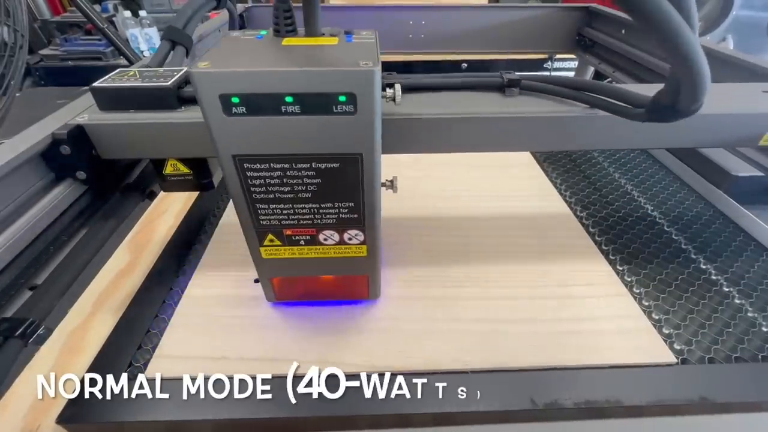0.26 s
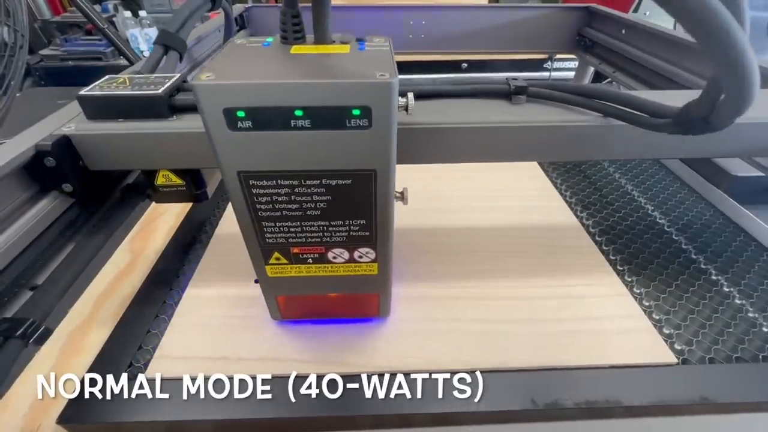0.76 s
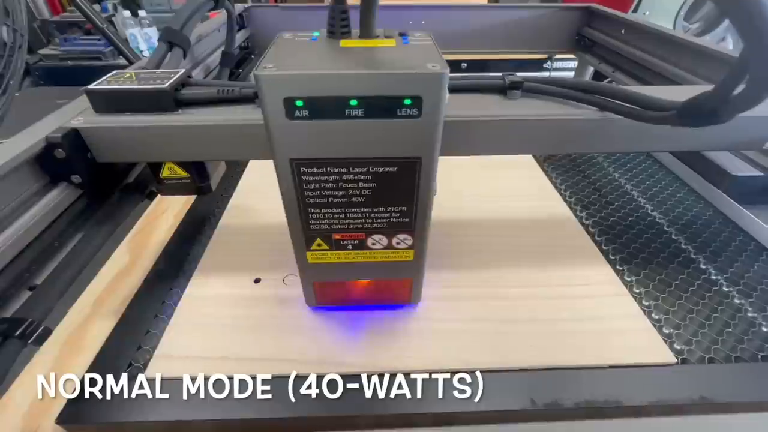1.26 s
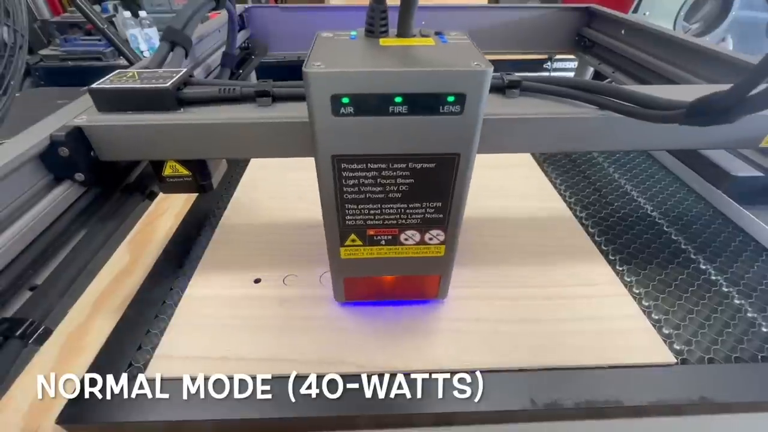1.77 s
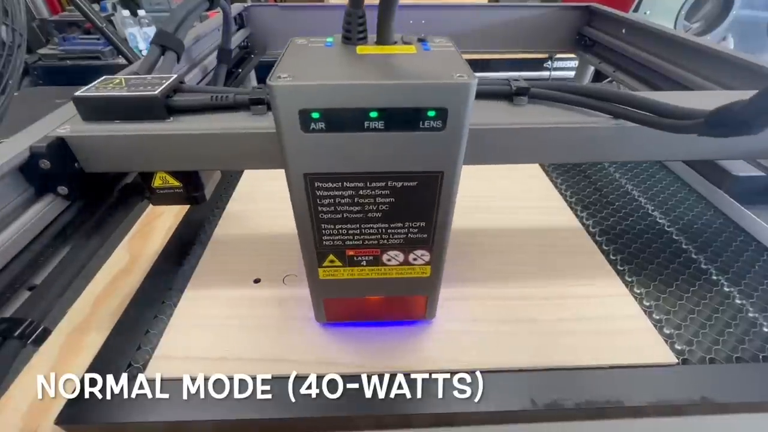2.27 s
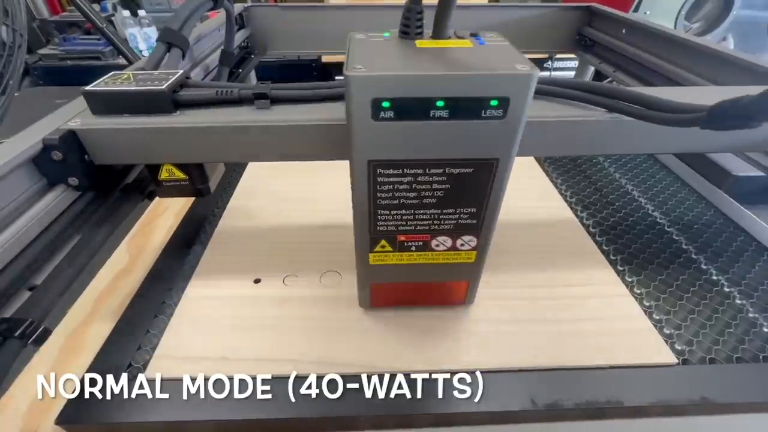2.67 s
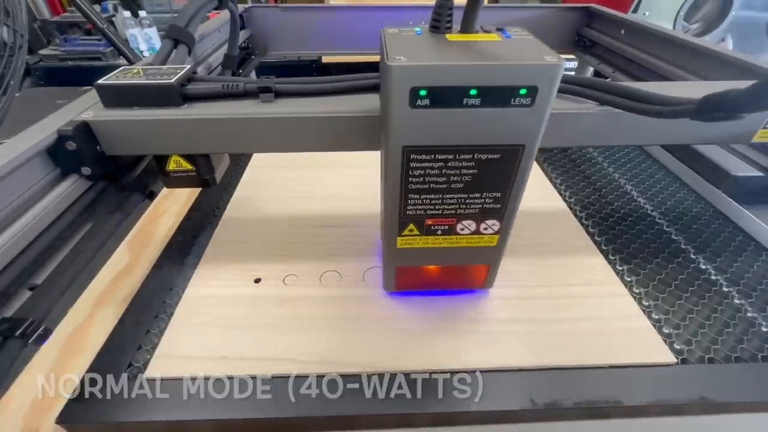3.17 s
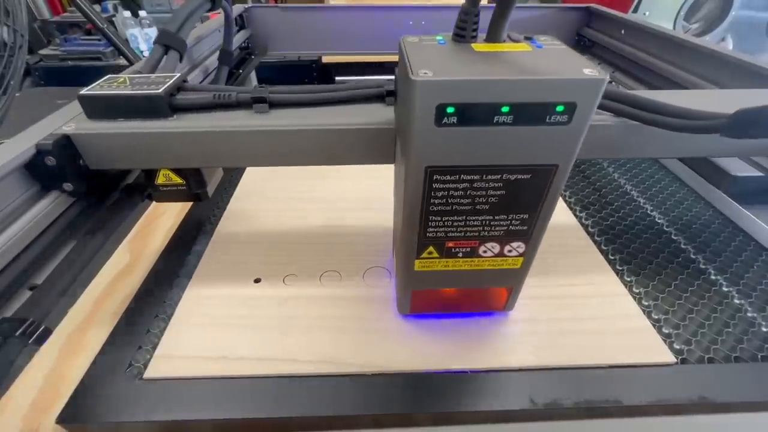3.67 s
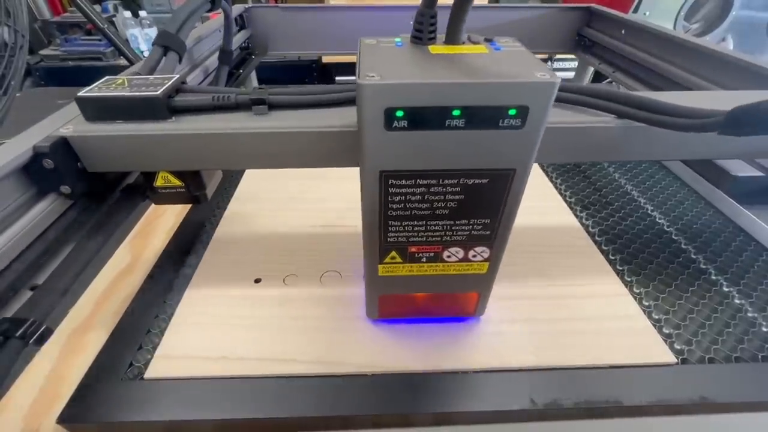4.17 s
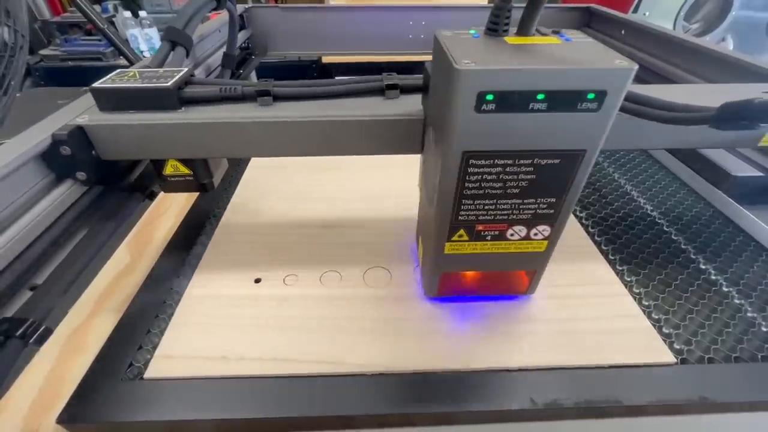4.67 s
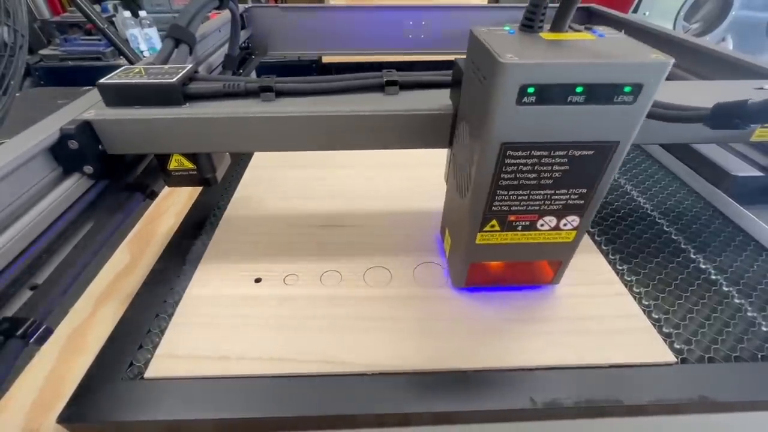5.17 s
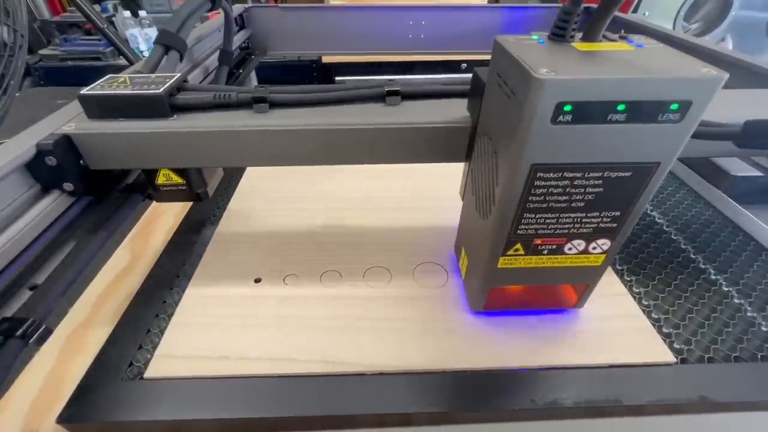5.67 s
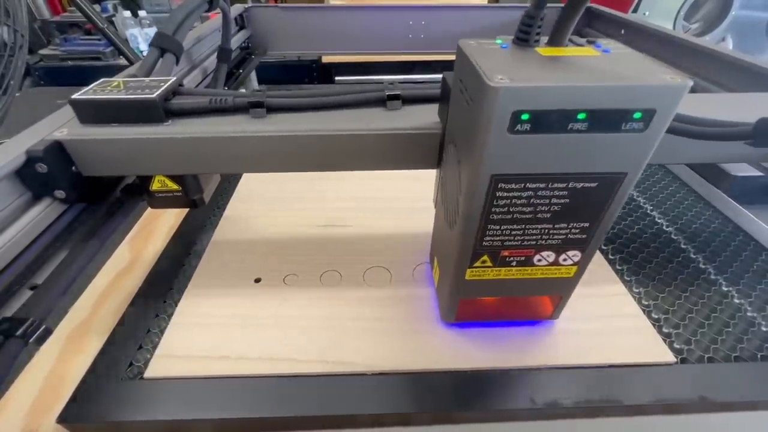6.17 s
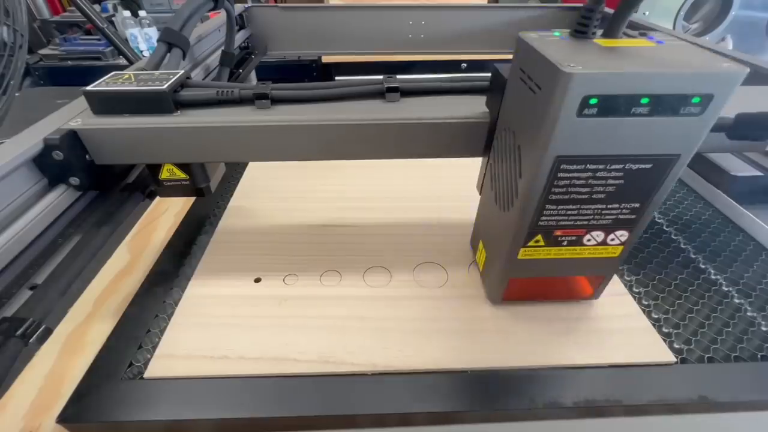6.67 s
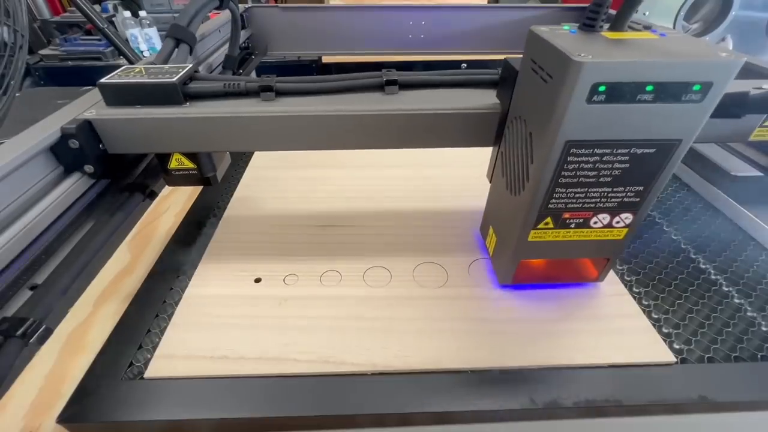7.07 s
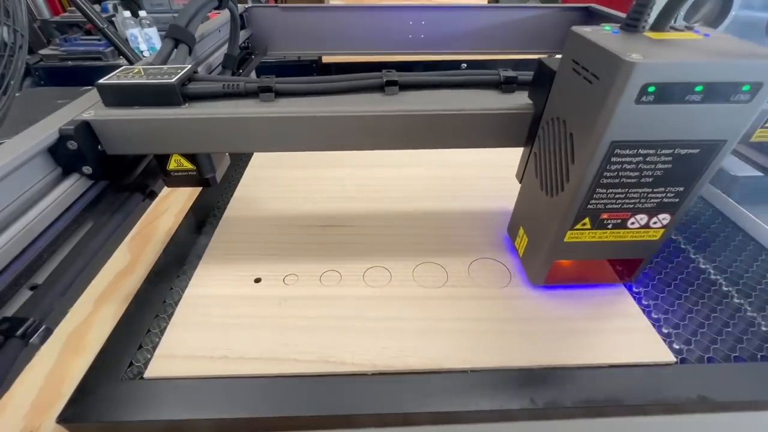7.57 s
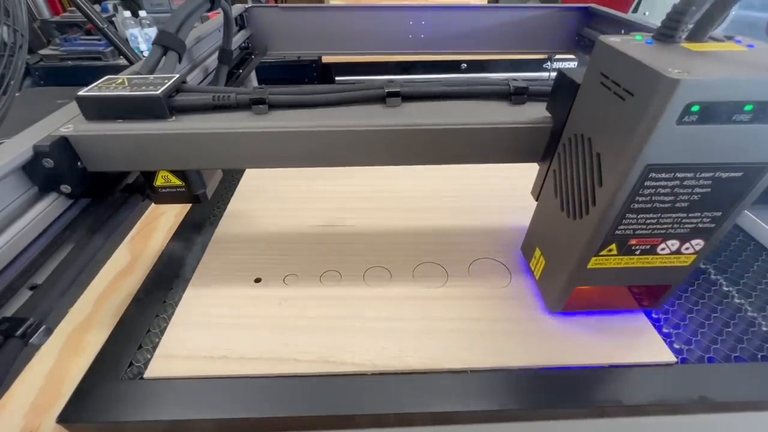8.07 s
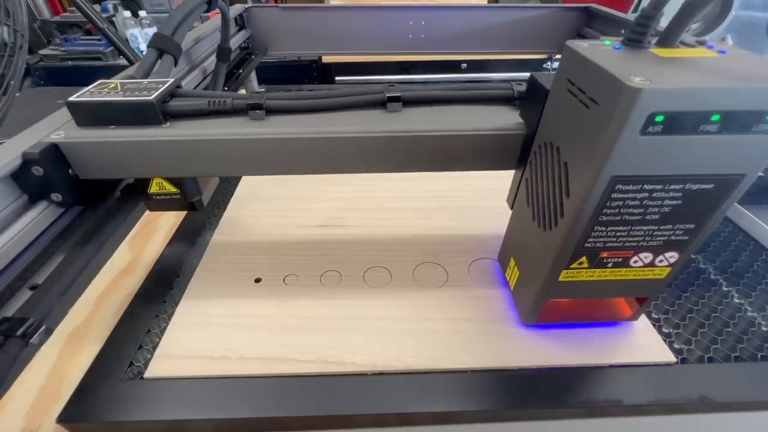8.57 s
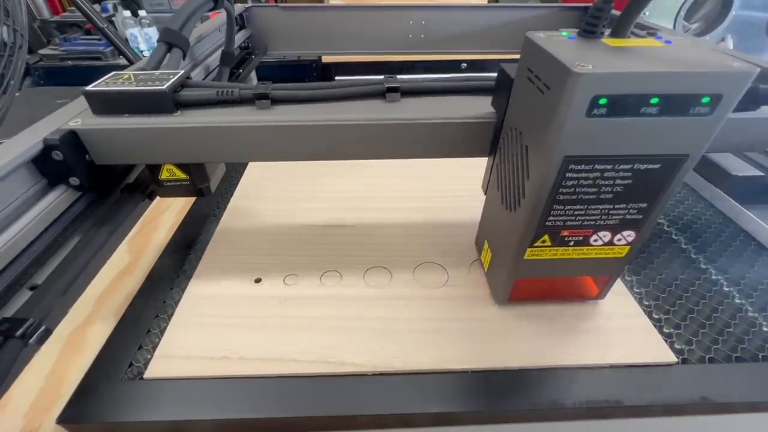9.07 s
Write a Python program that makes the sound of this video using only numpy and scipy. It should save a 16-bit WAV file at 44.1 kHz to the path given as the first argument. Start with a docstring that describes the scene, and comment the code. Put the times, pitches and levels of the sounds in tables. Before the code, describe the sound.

A laser cutter runs close to the microphone for about nine seconds. The main sound is the draught from its cooling fans buffeting the microphone: a rough, rapid flutter of short puffs and small crackly ticks, stronger on the left. A steady, bright air hiss lies beneath it, along with a faint hum from a slower fan. Two small fans add a thin, wavering, very high whine made of two close tones, strongest at the very start. The whine lifts slightly in pitch and falls back whenever the laser pauses, at the opening and around 1.1, 2.6, 4.4, 6.6 and 9.1 seconds. The buffeting drops briefly at about 1.4 seconds and turns weak and choppy between 6.6 and 6.9 seconds, returning each time. Otherwise the level stays even, and the machine is still running at the end.

```python
"""Laser cutter and its cooling fans.

A laser head traces circles on plywood. The turbulent draught of its cooling fans buffets two microphone
ports in short puffs, over a steady hiss of air. Two small fans whine at their blade-passing frequency and
speed up whenever the laser pauses and unloads the supply; a slower fan hums below them."""
import sys
import numpy as np
from scipy import signal
from scipy.fft import rfft, irfft, next_fast_len
from scipy.io import wavfile
from scipy.ndimage import uniform_filter1d

SR = 44100
rng = np.random.default_rng(int(sys.argv[2]) if len(sys.argv) > 2 else 0)


def waveform_to_disk(signal):
    """Save audio, clipped to [-1, 1], as 16-bit WAV at the path in sys.argv[1]."""
    frames = np.transpose(np.atleast_2d(signal))
    scaled = np.clip(frames, -1, 1) * 32767
    samples = np.round(scaled).astype(np.int16)
    wavfile.write(sys.argv[1], SR, samples)


N = 411012
FFT_SIZE = next_fast_len(N)

# Spectrum of the air hiss: (frequency [Hz], relative density [dB])
HISS_SPECTRUM = [(100, -26), (300, -10), (1000, -4.5), (1800, -3), (2500, -14), (2900, -25.5), (3500, -2),
                 (4100, -3.5), (4700, 4), (5600, -1.5), (6300, 3), (7300, 2.5), (9500, -1.5), (11300, 2),
                 (12200, -3), (13000, 0.5), (13600, -2), (14100, -3), (14700, -1.5), (15700, -1.5)]
# Loudness of the hiss: (time [s], level [dB])
HISS_ENVELOPE = [(0.0, -48), (1.5, -49.5), (2.3, -50), (3.0, -48.5), (4.4, -48.5), (5.5, -48), (6.5, -48),
                 (8.0, -47.5), (9.32, -48)]
# Hiss between the ears: (frequency [Hz], correlation [clipped to -1..1], left over right [dB])
HISS_IMAGE = [(300, 0.49, 6), (2450, -1.6, 2.5), (4540, 0.37, -2.5), (4960, -0.28, 2.5), (6800, 0.41, -1),
              (7750, -0.13, -1.5), (9450, 0.31, 0.5), (10600, -0.28, -1.5), (13100, -0.35, 1.5),
              (13800, 0, -1), (14700, .1, 1), (15700, -.1, 1)]
# Swell of the jet band as the head moves away to the right: (time [s], gain [dB])
JET_GAIN = [(0, 0), (2.5, -1), (4.5, -0.5), (7.5, 1), (9.32, 0.5)]

# Harmonics of the slow fan: (multiple of the shaft rate, relative level [dB])
SHAFT_HARMONICS = [(1, -9.5), (2, -3), (4, 1), (5, -9), (6, -14), (7, -16.5), (8, -15)]
# Its main line, the fourth harmonic: (time [s], base level [dB])
MAIN_LINE_LEVEL = [(0, -69), (0.6, -61), (1.5, -60.5), (1.9, -68), (2.4, -63), (3.2, -65), (3.9, -60),
                   (5.0, -64), (5.2, -71), (5.5, -65), (6.0, -65), (6.3, -79), (6.66, -73), (6.72, -62.5),
                   (8.0, -62), (8.9, -61), (9.32, -66)]
# Pauses of the laser between circles: (start [s], duration [s])
LASER_PAUSES = [(-0.065, 0.12), (1.075, 0.115), (2.545, 0.135), (4.39, 0.125), (6.535, 0.16), (9.075, 0.19)]
# Blade tones of the small fans while the laser burns: (time [s], upper fan [Hz], lower fan [Hz])
BLADE_PITCH = [(0.0, 6620, 6375), (0.3, 6622, 6376), (0.4, 6626, 6364), (0.57, 6612, 6346),
               (0.75, 6602, 6388), (0.95, 6592, 6364), (1.4, 6600, 6408), (1.58, 6582, 6382),
               (1.8, 6580, 6394), (2.02, 6612, 6392), (2.29, 6563, 6398), (2.53, 6605, 6360),
               (2.9, 6588, 6396), (3.2, 6592, 6374), (3.7, 6600, 6402), (4.13, 6558, 6402),
               (4.3, 6595, 6398), (4.85, 6580, 6396), (5.13, 6592, 6415), (5.32, 6598, 6460),
               (5.7, 6572, 6458), (6.0, 6594, 6452), (6.46, 6568, 6430), (7.0, 6592, 6465),
               (7.35, 6578, 6436), (7.85, 6580, 6462), (8.15, 6572, 6484), (8.52, 6597, 6460),
               (8.9, 6573, 6445), (9.32, 6590, 6460)]
# Their levels, supply loaded and unloaded: (time [s], left tone [dB], right tone [dB], octave [dB])
UPPER_LOADED = [(0.0, -64, -70, -59), (0.4, -59, -77, -62), (0.95, -61, -77, -64), (1.3, -62, -72, -68),
                (1.7, -60, -70, -76), (2.29, -59, -64, -77), (2.5, -61, -72, -77), (3.0, -65, -70, -59),
                (3.7, -60, -61, -57), (4.13, -58, -68, -62), (4.3, -60, -67, -64), (5.1, -63, -64, -65),
                (5.4, -61, -56, -71), (5.7, -60, -57.5, -74), (6.0, -61, -57.5, -60),
                (6.46, -57, -54.5, -61), (7.0, -69, -61, -70), (7.3, -68, -60, -59), (7.85, -76, -66, -67),
                (8.2, -70, -68, -62), (8.52, -69, -64, -65), (8.9, -60, -56, -79), (9.32, -66, -61, -59)]
LOWER_LOADED = [(0.0, -44, -63, -65), (0.3, -55.5, -71, -65), (0.57, -49, -71, -60),
                (0.95, -53.5, -75, -59), (1.35, -58, -70, -56), (1.58, -52, -61, -60),
                (1.9, -51.5, -60, -58), (2.25, -52.5, -61, -55), (2.53, -50, -64, -58),
                (3.1, -51, -53.5, -70), (3.74, -53.5, -53.5, -68), (4.35, -52.5, -58, -65),
                (4.85, -54, -50, -66), (5.13, -58, -53.5, -69), (5.32, -60, -63, -65), (5.9, -63, -66, -69),
                (6.46, -60, -71, -72), (7.0, -68, -64, -70), (7.35, -68, -63, -70), (8.1, -61, -64, -70),
                (8.9, -66, -63, -70), (9.32, -64, -65, -70)]
UPPER_UNLOADED = [(0, -68, -73, -64), (1.2, -55, -79, -72), (2.7, -56, -65, -60), (4.5, -58, -56, -54),
                  (6.7, -59, -60, -68), (9.3, -56, -53, -64)]
LOWER_UNLOADED = [(0, -58, -73, -66), (1.2, -64, -72, -68), (2.7, -63, -72, -68), (4.5, -68, -66, -70),
                  (6.7, -55, -46, -67), (9.3, -67, -75, -70)]

# Draught over the near port: (time [s], level [dB])
DRAUGHT_LEVEL = [(0.0, -40), (0.9, -41.5), (1.27, -42), (1.33, -47), (1.35, -49), (1.375, -60),
                 (1.39, -47.5), (1.48, -51), (1.52, -45), (1.8, -40.5), (2.05, -40), (2.2, -43),
                 (2.33, -44), (2.5, -42), (3.1, -40.5), (3.7, -42), (4.1, -42), (4.6, -40.5), (4.9, -41),
                 (5.3, -42), (5.9, -42.5), (6.52, -43.5), (6.58, -46), (6.6, -51), (6.655, -54),
                 (6.67, -62), (6.685, -48), (6.715, -53), (6.73, -41), (6.75, -57), (6.77, -47),
                 (6.79, -52), (6.81, -43.5), (6.86, -49.5), (6.91, -47.5), (6.97, -41.5), (7.05, -41.5),
                 (7.4, -42), (7.8, -42), (8.3, -43.5), (8.7, -41.5), (8.93, -43.5), (8.98, -45.5),
                 (9.1, -42.5), (9.32, -43)]
# Buffeting spectrum at each port: (frequency [Hz], relative density [dB])
NEAR_SPECTRUM = [(30, -45), (60, -39), (100, -25), (170, -3), (260, 4), (500, -1.5), (1000, -5),
                 (2000, -10.5), (2700, -14.5), (4500, -21), (7000, -41)]
FAR_SPECTRUM = [(30, -48), (60, -47), (100, -23), (170, -9.5), (260, -3.5), (500, -5), (1000, -12),
                (2000, -21), (4000, -18.5)]
# Strongest puffs on the near port: (time [s], base level [dB], treble offset [dB])
STRONG_PUFFS = [(0.058, -26, -8), (0.258, -34, 8), (0.301, -31, 5), (0.414, -29, -8), (0.441, -36, 4),
                (0.487, -32, 4), (0.892, -28, -6), (0.92, -44, 3), (1.224, -28, 0), (1.253, -29, -7),
                (1.401, -31.5, 0), (1.468, -32, 1), (1.506, -28, 3.5), (1.597, -27.5, -7), (1.645, -38, 10),
                (1.731, -24, 0), (1.855, -39, 3), (1.871, -34, 4), (2.023, -29, 0), (2.06, -36, 5),
                (2.122, -32, 2), (2.2, -31, -4), (2.213, -31, 3), (2.246, -29.5, 1), (2.269, -37, 4),
                (2.453, -27.5, -18), (2.463, -32, -6), (2.757, -33, 2), (2.792, -39, 4), (2.856, -31, 1),
                (2.877, -33, 3), (3.065, -42, 12), (3.147, -35, 9), (3.273, -36, 8), (3.355, -32, 1),
                (3.511, -38, 6), (3.777, -36, 6), (3.996, -35, -2), (4.133, -30, -2), (4.266, -31, 4),
                (4.384, -42, 1), (4.442, -36, 5), (4.613, -27, 0), (4.635, -41, 1), (4.813, -40, 2),
                (4.94, -29, 1), (5.092, -33, 3), (5.257, -38, -11), (5.329, -30.5, -11), (5.421, -33, 4),
                (5.431, -40, 11), (5.498, -36, 5), (5.605, -27, -6), (5.964, -29.5, 4), (6.039, -28, 3),
                (6.062, -32.5, 6), (6.213, -29.5, -6), (6.249, -27, -15), (6.315, -40, -6),
                (6.426, -27.5, 1.5), (6.51, -29.5, 1), (6.558, -29.5, -6), (6.728, -33, -13),
                (6.768, -38, -8), (6.871, -35, -8), (6.905, -31, -10), (7.209, -28, -1), (7.453, -33, 0),
                (7.712, -33, 2), (7.774, -33, 2), (7.789, -27, -4), (7.87, -33, 4), (8.332, -26, 0),
                (8.443, -23.5, -15), (8.544, -29, -9), (8.663, -27.5, -10), (8.864, -34.5, 7.5),
                (9.068, -26, 0.5), (9.122, -39, 8), (9.164, -35, -3)]
# Pressure swings that make up a puff's tick: (low edge [Hz], high edge [Hz], gain [dB])
TICK_SWINGS = [(2870, 4700, -7.5), (3600, 5260, -3.5), (4930, 8100, -6.5)]
# Leak of the near port into the right channel: (frequency [Hz], gain [dB], phase [rad])
PORT_LEAK = [(60, -29, -1.5), (236, -4, -2), (504, -9.5, -2), (1080, -16, -2), (1930, -7.5, -2),
             (2570, -2, -3.5), (2830, -2, -2), (3670, -18, -2), (4500, -7, -8.5), (7000, -18, -8)]


def amp(db):
    """Decibels as an amplitude ratio."""
    return 10 ** (np.asarray(db) / 20)


def rms_one(x):
    """The signal scaled to unit rms."""
    return x / np.sqrt(np.mean(x ** 2) + 1e-20)


def in_time(rows):
    """Columns of a time table, interpolated at every sample."""
    times, *columns = np.transpose(rows)
    return [np.interp(np.arange(N) / SR, times, c) for c in columns]


def in_hz(rows):
    """Columns of a spectrum table, interpolated in log frequency at every FFT bin."""
    hz, *columns = np.transpose(rows)
    return [np.interp(np.log(np.fft.rfftfreq(FFT_SIZE, 1 / SR) + 1), np.log(hz), c) for c in columns]


def drift(corner_hz):
    """A random process of unit rms: white noise through two one-pole low-passes."""
    pole = np.exp(-2 * np.pi * corner_hz / (SR / 8))
    slow = signal.lfilter([1], [1, -2 * pole, pole ** 2], rng.standard_normal(N // 8 + 4002))[4000:]
    return np.interp(np.arange(N) / 8, np.arange(len(slow)), rms_one(slow))


def flutter(corner_hz, average_s=0.1):
    """Fluctuation about a running mean: a drift without its slow swells."""
    quick = drift(corner_hz)
    return rms_one(quick - uniform_filter1d(quick, int(average_s * SR)))


def hiss(jet_band_hz=(6500, 8800)):
    """Jet and fan flow radiate broadband noise, partly correlated between the ears."""
    correlation, balance_db = in_hz(HISS_IMAGE)
    correlation = np.clip(correlation, -1, 1)
    mid, side = rfft(rng.standard_normal((2, FFT_SIZE))) * amp(in_hz(HISS_SPECTRUM)[0])
    spectra = np.sqrt(1 + correlation) * mid + np.sqrt(1 - correlation) * side * [[1], [-1]]
    ears = irfft(spectra * amp(np.outer([.5, -.5], balance_db)), FFT_SIZE)[:, :N]
    jet = signal.sosfilt(signal.butter(2, jet_band_hz, "band", fs=SR, output="sos"), ears)
    ears = ears + jet * (amp(in_time(JET_GAIN)[0]) - 1)
    return rms_one(ears) * amp(in_time(HISS_ENVELOPE)[0] + .5 * drift(19))


def slow_fan(main_hz=1104, sag_hz_per_s=0.98, side_base_db=-64, flutter_db=2.5):
    """A rotor is a periodic source: it hums at multiples of its wavering shaft rate."""
    main_db = in_time(MAIN_LINE_LEVEL)[0]
    hz = main_hz - sag_hz_per_s * np.arange(N) / SR + 2.0 * drift(4) + 3.5 * drift(30)
    shaft_angle = 2 * np.pi * np.cumsum(hz) / SR / 4
    hum = 0
    for order, db in SHAFT_HARMONICS:
        level_db = db + (main_db if order == 4 else side_base_db) + flutter_db * drift(9.4)
        hum += amp(level_db) * np.sin(order * shaft_angle + order)
    return np.sqrt(2) * hum * amp([[0.6], [-0.6]])


def unloading(lag_s=0.036):
    """Supply and rotors act as two first-order lags: 0 while the laser burns, towards 1 in a pause."""
    t = np.arange(-SR, N) / SR
    pole = np.exp(-1 / (lag_s * SR))
    paused = sum((t >= start) & (t < start + length) for start, length in LASER_PAUSES)
    return signal.lfilter([(1 - pole) ** 2], [1, -2 * pole, pole ** 2], paused + 1e-18)[SR:]


def whine(hz, loaded, unloaded, free, wobble_hz, skirt_db, right_rad, octave_right_rad):
    """Blade passage gives a tone and its octave; uneven flow modulates them into a noisy skirt."""
    speed_up, flutter_db, octave_skirt = 0.025, 2.0, 0.53
    left_db, right_db, octave_db = (1 - free) * in_time(loaded) + free * in_time(unloaded)
    phase = 2 * np.pi * np.cumsum(hz * (1 + speed_up * free) + wobble_hz * drift(16.93)) / SR
    skirt = amp(skirt_db) * (drift(113) + 1j * drift(100))
    tone = (amp(flutter_db * drift(14)) + skirt) * np.exp(1j * phase)
    octave = amp(octave_db) * (amp(flutter_db * drift(16)) + octave_skirt * skirt) * np.exp(2j * phase)
    left = amp(left_db) * tone + octave
    right = amp(right_db) * tone * np.exp(1j * right_rad) + octave * np.exp(1j * octave_right_rad)
    return np.sqrt(2) * np.real([left, right])


def small_fans():
    """Blade frequency follows rotor speed, so both whines rise when the supply is unloaded."""
    free = unloading()
    upper_hz, lower_hz = in_time(BLADE_PITCH)
    upper = whine(upper_hz, UPPER_LOADED, UPPER_UNLOADED, free,
                  wobble_hz=6.45, skirt_db=-5.5, right_rad=0.43, octave_right_rad=-0.82)
    lower = whine(lower_hz, LOWER_LOADED, LOWER_UNLOADED, free,
                  wobble_hz=5.45, skirt_db=-8.5, right_rad=-1.03, octave_right_rad=2.4)
    return upper + lower


def buffet(spectrum, gusts_db, eddies_db, flutter_db, sharpen, lag_s, cutoff_hz=6500):
    """Shared eddies modulate octave bands of noise; the treble follows sooner and more sharply."""
    hz = np.fft.rfftfreq(FFT_SIZE, 1 / SR) + 1
    octaves = np.clip(np.log2(hz / 125), 0, 5)
    white = rfft(rng.standard_normal(FFT_SIZE))
    pressure = 0
    for k in range(6):
        share = np.cos(np.pi / 2 * np.clip(octaves - k, -1, 1)) ** 2
        band = irfft(white * share, FFT_SIZE)[:N]
        delayed_db = np.roll(eddies_db, int(lag_s * SR / 2 ** k))
        swing_db = gusts_db + delayed_db * (0.5 + sharpen * k) + flutter_db * flutter(35)
        pressure += band * rms_one(amp(swing_db))
    colour = amp(in_hz(spectrum)[0]) / (1 + (hz / cutoff_hz) ** 4)
    return rms_one(irfft(rfft(pressure, FFT_SIZE) * colour, FFT_SIZE)[:N])


def vortices(times, level_db, low_hz, high_hz, width_cycles):
    """A vortex sweeping the port gives a few swings of pressure under a Gaussian envelope."""
    pitch, start = rng.random((len(times), 2)).T[:, :, None]
    hz = low_hz * (high_hz / low_hz) ** pitch
    offsets = np.arange(-500, 500)
    cycles = hz * offsets / SR
    envelope = amp(level_db)[:, None] * np.exp(-(cycles / width_cycles) ** 2)
    pulses = envelope * np.cos(2 * np.pi * (cycles + start))
    samples = np.clip((times[:, None] * SR).astype(int) + offsets, 0, N - 1)
    return np.bincount(samples.ravel(), pulses.ravel(), N)


def puffs(near_db, weak_count=900, tick_scatter_s=0.002, flick_gap_s=0.0016):
    """Each puff is a pressure transient: a bright tick, a midrange flick, then a duller push."""
    when, size, bright = rng.random((weak_count, 3)).T
    weak = [when * N / SR, near_db[(when * N).astype(int)] + 0.26 + 7 * size, -8 + 7.5 * bright]
    times, level_db, treble_db = np.concatenate([np.transpose(STRONG_PUFFS), weak], axis=1)
    delays = tick_scatter_s * (rng.random((len(times), len(TICK_SWINGS))).T - .5)
    tick = sum(vortices(times + delay, level_db + treble_db + db, low_hz, high_hz, width_cycles=1.5)
               for delay, (low_hz, high_hz, db) in zip(delays, TICK_SWINGS))
    flick = (vortices(times - flick_gap_s / 2, level_db - 3.5, 1150, 1590, width_cycles=1)
             + vortices(times + flick_gap_s / 2, level_db - 3.5, 590, 1130, width_cycles=1))
    push_db = level_db - 8.5 + 7 * rng.random(len(times))
    push = vortices(times + 0.00194, push_db, 266, 870, width_cycles=0.91)
    return tick + flick + push


def draught(far_gain_db=-5.5):
    """Turbulence presses on both ports; the directional mix leaks the near one right, phase-shifted."""
    near_db = in_time(DRAUGHT_LEVEL)[0]
    gusts_db = 2 * np.tanh(flutter(40))
    eddies_db = 3.8 * np.tanh(3.1 * flutter(115) / 5.3)   # the largest eddies are bounded
    near = buffet(NEAR_SPECTRUM, gusts_db, eddies_db, flutter_db=2.5, sharpen=0.25, lag_s=0.0064)
    far = buffet(FAR_SPECTRUM, gusts_db, 1.4 * flutter(56), flutter_db=3.0, sharpen=0.093, lag_s=0.02)
    near = amp(near_db) * near + puffs(near_db)
    far = amp(near_db + far_gain_db) * far
    leak_db, phase = in_hz(PORT_LEAK)
    leak = irfft(rfft(near, FFT_SIZE) * amp(leak_db) * np.exp(1j * phase), FFT_SIZE)[:N]
    return np.array([near, far + leak])


def scene():
    """Superposition: the pressures of fans, draught and hiss add in each channel."""
    return small_fans() + draught() + hiss() + slow_fan()


def record(dry, cutoff_hz=15720):
    """Band limiting: an elliptic low-pass cuts the top steeply."""
    return signal.sosfilt(signal.ellip(14, .3, 75, cutoff_hz, fs=SR, output="sos"), dry)


dry = scene()
out = record(dry)
waveform_to_disk(out)
```